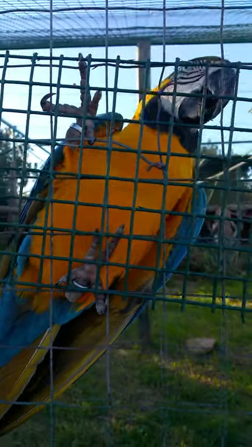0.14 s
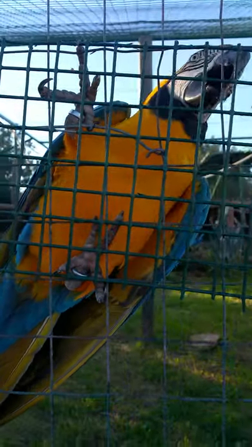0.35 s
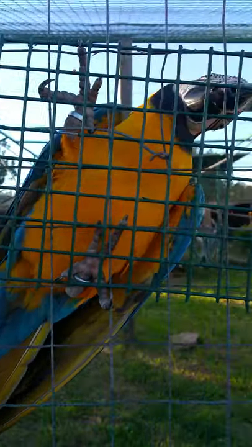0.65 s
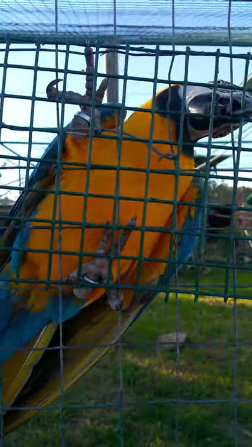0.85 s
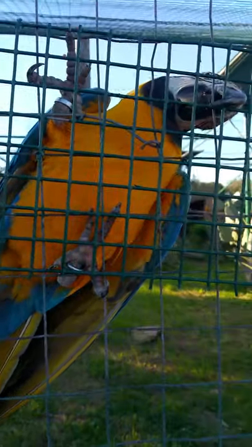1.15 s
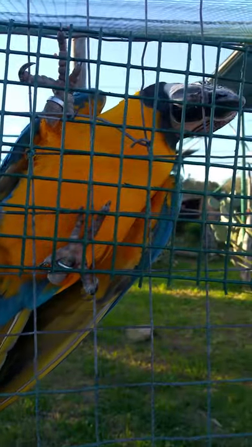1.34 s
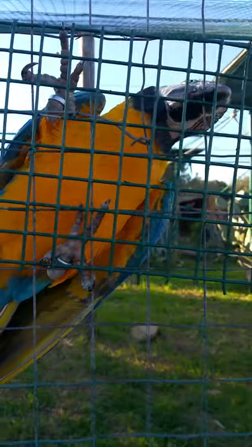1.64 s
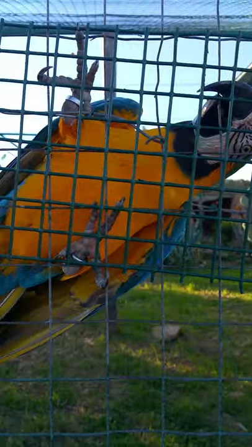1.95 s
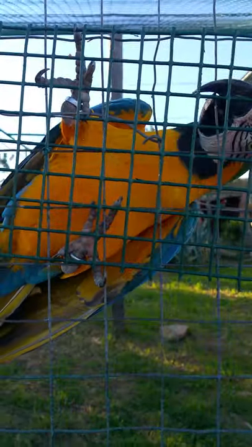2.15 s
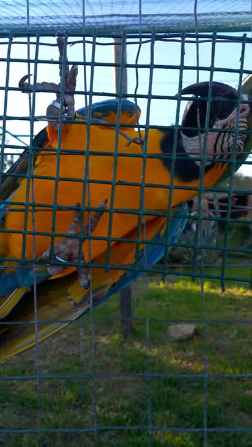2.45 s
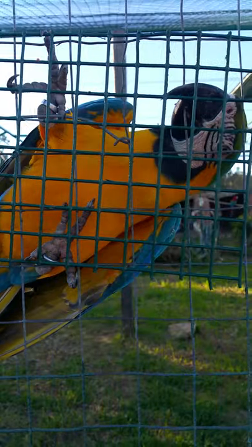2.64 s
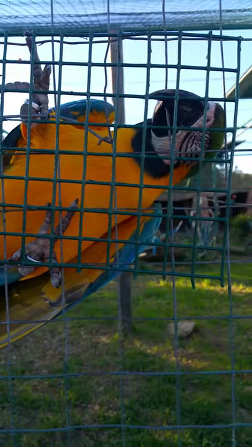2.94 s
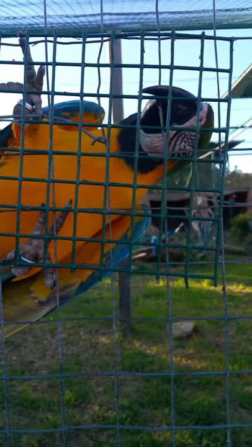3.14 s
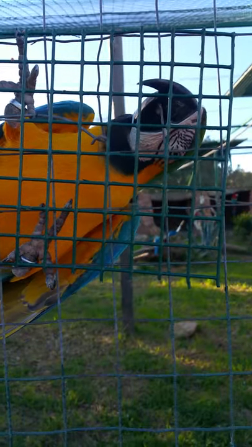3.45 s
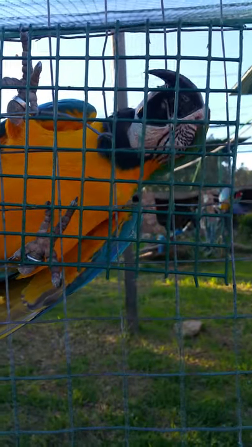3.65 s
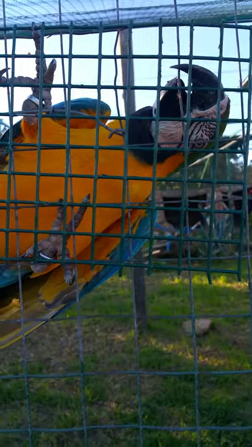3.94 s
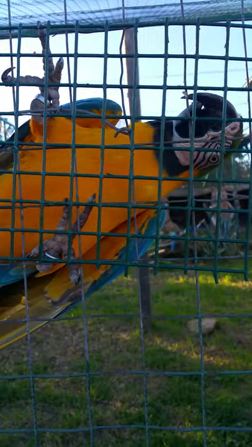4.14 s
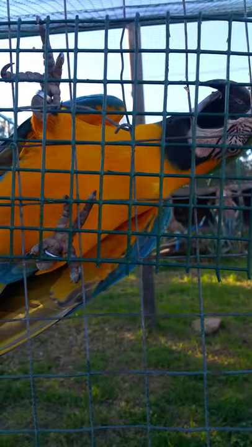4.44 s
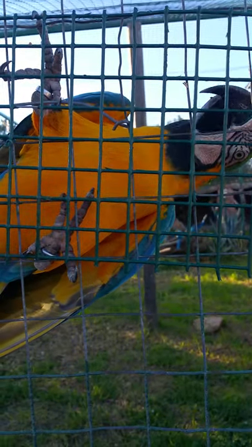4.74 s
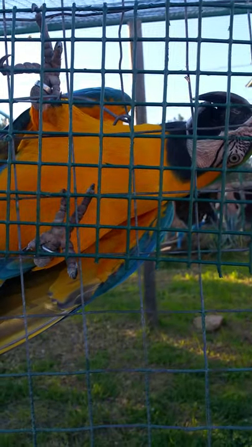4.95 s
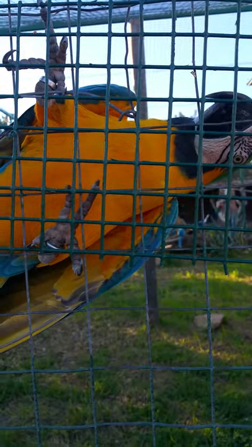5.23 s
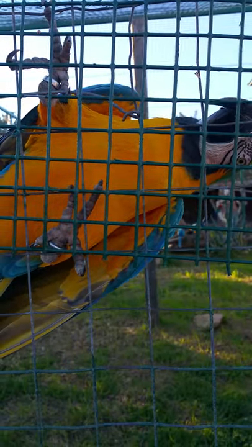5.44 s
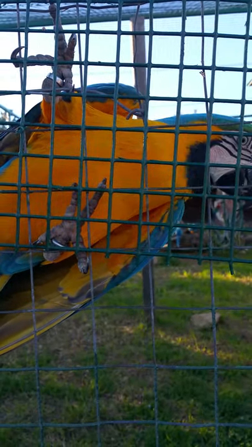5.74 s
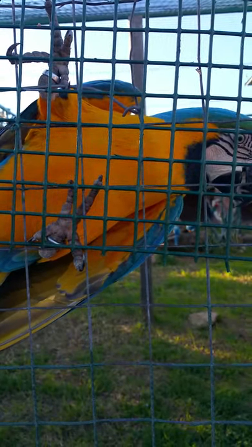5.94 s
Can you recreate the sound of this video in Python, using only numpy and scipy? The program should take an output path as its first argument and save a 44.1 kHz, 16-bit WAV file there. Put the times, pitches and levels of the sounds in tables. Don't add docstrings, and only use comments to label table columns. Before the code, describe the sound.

Loud raspy parrot squawk at the start, several seconds of faint bird chatter and soft wire ticks over airy hum, then a second hoarse squawk.

```python
import sys
import numpy as np
from scipy import signal
from scipy.fft import rfft, irfft
from scipy.io import wavfile
from scipy.ndimage import uniform_filter1d

SR = 44100
rng = np.random.default_rng(int(sys.argv[2]) if len(sys.argv) > 2 else 0)


def unload_wav(signal):
    wavfile.write(
        sys.argv[1],
        SR,
        np.round(np.clip(np.atleast_2d(signal).T, -1, 1) * 32767).astype(np.int16),
    )


def linear_from_db(decibels):
    return 10 ** (np.asarray(decibels, float) / 20)


N = 268480
TIME = np.arange(N) / SR

# [t/s, level/dB]
PHONE_GAIN = [(0, 0.5), (.15, 4), (.3, -12), (.55, -9), (1.65, -11), (1.9, -2), (2.5, -.5), (5, .5),
              (5.6, -1.5), (5.8, 3.5)]
# [f/Hz, width/Hz, level/dB]
WIDE_BEAK = [(2820, 550, 0), (4070, 930, 5.5), (5000, 540, 0.5), (5700, 590, -10.5), (8900, 1900, -20.5),
             (13000, 3000, -31)]
# [t/s, brightness/dB]
FIRST_BEAK_OPENING = [(.164, -3), (.19, -16), (.217, -5.5), (.29, 0), (.39, 4), (.46, 2), (.49, -10.5)]
THROB_SAG = 0.031


def level(x, db):
    return x * linear_from_db(db) / np.sqrt(np.mean(x ** 2))


def read(table, at):
    return np.interp(at, *np.transpose(table))


def colour(x, table):
    hz, db = np.transpose(table)
    bins = np.log(np.fft.rfftfreq(N, 1 / SR) + 1e-3)
    return irfft(rfft(x) * linear_from_db(np.interp(bins, np.log(hz), db, left=-80, right=-80)), N)


def walk(rate):
    k = int(SR / rate)
    steps = np.repeat(rng.standard_normal(N // k + 1), k)
    return 1.3 * uniform_filter1d(uniform_filter1d(steps, k), k)[:N]


def swells(table, calm_db):
    power = linear_from_db(2 * calm_db)
    for middle, width, db in table:
        power = power + linear_from_db(2 * db) * np.exp(-((TIME - middle) / width) ** 2)
    return np.sqrt(power) * linear_from_db(read(PHONE_GAIN, TIME))


def ports(x, lag_ms, pan_db):
    turn = np.exp(-2j * np.pi * np.fft.rfftfreq(N, 1 / SR) * lag_ms / 1000)
    later = irfft(rfft(x) * turn, N)
    return np.array([x * linear_from_db(pan_db / 2), later * linear_from_db(-pan_db / 2)])


def scatter(x, t60, db):
    t = np.arange(int(SR * .6)) / SR
    fade = np.exp(-np.log(1000) * t / t60) * (t > .004)
    tail = rng.standard_normal((2, len(t))) * fade
    tail = tail / np.sqrt(np.sum(tail ** 2) / 2)
    return linear_from_db(db) * signal.fftconvolve(x[None], tail, axes=1)[:, :N]


def air():
    # [f/Hz, level/dB per Hz]
    hum_colour = [(65, -27), (110, 0), (140, -4.5), (324, -5.5), (371, -9), (569, -8.5), (802, -9.5),
                  (1020, -8), (1650, -13.5), (2570, -17), (3100, -14), (5190, -15), (6590, -33),
                  (8570, -58), (14500, -120)]
    # [f/Hz, likeness 0-1]
    likeness = [(60, 0.98), (120, 1), (230, 0.92), (440, 0.93), (840, 0.81), (1640, 0.49), (3170, 0.03),
                (6140, 0.1)]
    # [f/Hz, level/dB per Hz]
    treble_colour = [(6000, -7), (7000, -3), (9000, -4.5), (12000, -4.5), (15500, -8.5), (16500, -12)]
    alike_hz, alike_share = np.transpose(likeness)
    hum, swell = 0, walk(1.8)
    for hz in 68 * 2 ** np.arange(0, 7.6, .5):
        band = [(hz / 1.42, -30), (hz / 1.1, 0), (hz * 1.1, 0), (hz * 1.42, -30)]
        mid, side = (colour(rng.standard_normal(N), band) for _ in range(2))
        alike = np.clip(np.interp(np.log(hz), np.log(alike_hz), alike_share), 0, 1)
        pair = np.sqrt(1 + alike) * mid + np.sqrt(1 - alike) * side * np.array([[1], [-1]])
        hum = hum + linear_from_db(0.43 * swell + 2.86 * walk(6)) * pair
    hum = level(np.array([colour(port, hum_colour) for port in hum]), -49.5 + 0.5)

    hiss_hz, hiss_width_hz = 12920, 460
    band = [(hiss_hz - hiss_width_hz, -25), (hiss_hz, 0), (hiss_hz + hiss_width_hz, -25)]
    hiss = level(np.array([colour(rng.standard_normal(N), band) for _ in range(2)]), -77.5)
    treble = level(np.array([colour(rng.standard_normal(N), treble_colour) for _ in range(2)]), -68.5)
    return (hum + hiss + treble * linear_from_db(1.3 * walk(14))) * linear_from_db(read(PHONE_GAIN, TIME))


def rumble():
    # [f/Hz, level/dB per Hz]
    bass_colour = [(28, -21), (42, 1.5), (56, 1), (75, -5.5), (100, 0), (125, -22.5)]
    # [middle t/s, half width/s, level/dB]
    gusts = [
        (2.2, .15, -55),
        (2.9, 0.31, -50),
        (5.2, 0.19, -54),
    ]
    mid, side = (level(colour(rng.standard_normal(N), bass_colour), -2.0) for _ in range(2))
    pair = np.array([1.07 * mid + 0.057 * side, 1.17 * mid - .12 * side])
    return swells(gusts, calm_db=-54) * linear_from_db(1.5 * walk(4.93)) * pair


def whistle(length, hz0, hz1, hz2, overtone_db, waver):
    u = np.arange(int(length * SR)) / (length * SR)
    hz = hz0 + (4 * hz1 - 3 * hz0 - hz2) * u + (2 * hz0 + 2 * hz2 - 4 * hz1) * u ** 2
    wobble = np.interp(u * length * 250, np.arange(128), rng.standard_normal(128))
    hz = hz * (1 + waver * min(.05 / length, 1) ** 2 * wobble)
    phase = 2 * np.pi * np.cumsum(hz) / SR
    ends = np.minimum(np.sin(np.pi * u) * max(length / 0.029, 1), 1) ** 0.7
    return ends * (np.sin(phase) + linear_from_db(overtone_db) * np.sin(2 * phase))


def flock():
    # [f/Hz, level/dB per Hz]
    chatter_colour = [(820, -59), (1400, -31), (1610, -26), (1780, -6), (2410, -6), (2860, -3.5),
                      (3560, -4), (4770, -9), (6590, -20.5), (8570, -68), (14500, -120)]
    # [middle t/s, half width/s, level/dB]
    bouts = [(.62, 0.053, -49.5), (.83, 0.032, -56), (1.14, 0.052, -49), (1.35, 0.053, -49.5),
             (1.82, 0.085, -52), (2.06, 0.081, -53), (2.31, 0.071, -46.5), (2.6, 0.078, -48),
             (2.84, 0.057, -45), (3.09, 0.056, -42.5), (3.57, 0.17, -47.5), (3.93, 0.2, -51),
             (4.17, 0.048, -49.5), (4.29, 0.046, -46), (4.55, 0.061, -48.5), (4.72, 0.037, -52.5),
             (4.99, 0.064, -45), (5.37, 0.051, -49.5), (5.5, .05, -51.5)]
    out = np.zeros(N + SR)
    for when, pitch, fall, length, size in rng.random((7000, 5)):
        hz = 1500 * 4.6 ** pitch
        middle_hz, last_hz = hz * (1 - 0.0798 * fall), hz * (1 - 0.36 * fall)
        note = whistle(0.0044 + 0.02 * length, hz, middle_hz, last_hz, overtone_db=-26, waver=0.0342)
        start = int(when * N)
        out[start:start + len(note)] += np.sqrt(hz) * linear_from_db(-1.5 * np.log(size)) * note
    out = level(colour(out[:N], chatter_colour), -0.97) * swells(bouts, calm_db=-57.5)
    return ports(out, lag_ms=.03, pan_db=-1.5) * linear_from_db(-2.0) + scatter(out, t60=0.17, db=-2)


def sing(table, waver, flutter_db):
    out = np.zeros(N)
    for s, length, *hz, db in table:
        note = linear_from_db(db) * whistle(length, *hz, overtone_db=-25, waver=waver)
        out[int(s * SR):int(s * SR) + len(note)] += note
    return out * linear_from_db(flutter_db * walk(80))


def glides(table, early):
    return [(s, length, a, a + (b - a) * (.5 + early), b, db) for s, length, a, b, db in table]


def puffs(hz, swell, jitter, shimmer_db, air_db):
    chance, taps = rng.standard_normal((128, 2)), np.arange(-8, 9)
    out = linear_from_db(air_db) * np.append(swell * rng.standard_normal(N // 16)[:len(hz)], np.zeros(17))
    place = 0.
    for wander, size in chance:
        i = int(place)
        if i >= len(hz):
            break
        puff = np.sinc(taps - place + i) * np.hanning(19)[1:-1]
        out[i + 8 + taps] += swell[i] * linear_from_db(shimmer_db * size) * puff
        place += SR / hz[i] * np.exp(jitter * wander)
    return out


def ring(pulses, modes):
    t = np.arange(SR // 20) / SR
    tones = 0
    for k, (f, width, db) in enumerate(modes):
        tones = tones + (-1) ** k * linear_from_db(db) * np.exp(-np.pi * width * t) * np.sin(2 * np.pi * f * t)
    return signal.fftconvolve(pulses, tones * (np.exp(-t / .00015) - 1))[:N]


def voice(runs, throat, beak, hiss_db, **roughness):
    low, high = np.zeros(N + SR), np.zeros(N + SR)
    for s, hz, swell, bright_db in runs:
        burst, start = puffs(hz, swell, **roughness), int(s * SR) - 8
        breath = swell * rng.standard_normal(N // 16)[:len(hz)]
        hiss = linear_from_db(hiss_db) * np.append(breath, np.zeros(17))
        low[start:start + len(burst)] += burst
        high[start:start + len(burst)] += (burst + hiss) * linear_from_db(bright_db)
    return ring(low, throat) - ring(high, beak)


def throb(s, length, hz0, hz1, db, bright_db, start):
    u = np.arange(int(length * SR)) / (length * SR)
    swell = linear_from_db(db) * np.minimum(start + 2.8 * u, 1) * np.minimum(0.46 + 1.3 * (1 - u), 1)
    return s, hz0 + (hz1 - hz0) * u, swell, bright_db


def far_parrot():
    # [t/s, length/s, peak level/dB]
    growl_table = [
        (5.14, .15, -48),
        (5.25, 0.068, -44),
        (5.33, 0.098, -43.5),
        (5.425, .07, -42.5),
        (5.489, .091, -43),
        (5.574, .068, -50.5),
    ]
    # [f/Hz, width/Hz, level/dB]
    far_throat = [(656, 200, -2.5), (873, 130, -2.5), (1433, 210, -3)]
    barks = [(1.784 + k * .036, .018, 300, 300, -48, -2.5) for k in range(3)]
    growl = [(s, length, 139.3, 139.3, db, -24) for s, length, db in growl_table]
    runs = [throb(*row, start=0.64) for row in barks + growl]
    return voice(runs, far_throat, WIDE_BEAK, jitter=0.0503, shimmer_db=6.0, air_db=-21, hiss_db=-22)


def single_birds():
    # [t/s, length/s, f/Hz, peak level/dB]
    whistles = [(0, 0.06, 3410, -51), (.51, 0.056, 1950, -53), (.67, .03, 6300, -74),
                (.703, .05, 6050, -71), (1.43, .2, 2644, -62.5), (1.6, 0.29, 2650, -61.5),
                (2.2, 0.077, 2780, -58), (2.488, 0.15, 908, -52), (3.25, 0.08, 181, -53.5),
                (3.29, 0.17, 852, -58), (3.865, 0.1, 4310, -41.5), (3.965, 0.059, 4365, -40.5)]
    # [t/s, length/s, first f/Hz, last f/Hz, peak level/dB]
    chirps = [(.64, 0.094, 3440, 3010, -58), (.81, .047, 3400, 2930, -64), (1.513, .032, 5450, 4640, -63.5),
              (2.505, 0.039, 4580, 3900, -48.5), (2.695, .023, 6230, 5250, -34),
              (2.781, .029, 6300, 4720, -38), (2.809, .049, 3670, 2350, -48.5),
              (3.645, 0.082, 2620, 2200, -57), (3.809, .041, 4450, 3750, -46),
              (4.035, 0.026, 2820, 2590, -45.5), (4.178, 0.036, 6190, 5070, -35.5),
              (4.263, .038, 6420, 3620, -38), (4.292, 0.081, 3400, 2150, -48.5),
              (4.533, 0.072, 2370, 2080, -51), (4.675, 0.029, 5700, 4300, -42),
              (4.699, 0.043, 4140, 3100, -41), (4.734, .041, 4020, 3000, -42.5),
              (4.838, 0.048, 5200, 4200, -55), (5.102, 0.031, 3900, 3556, -49),
              (5.21, 0.04, 3340, 3030, -54.5), (5.302, 0.095, 3750, 3050, -54),
              (5.415, 0.041, 6430, 4130, -40), (5.71, .039, 4660, 4300, -47)]
    # [t/s, length/s, first f/Hz, last f/Hz, peak level/dB]
    risers = [
        (1.868, .1, 490, 580, -51.5),
        (3.957, 0.035, 3300, 3620, -42.5),
        (3.993, 0.037, 2900, 3500, -41),
        (4.49, .028, 2430, 2560, -42),
        (4.738, 0.062, 2460, 2700, -52),
        (5.39, .028, 4070, 6480, -42.5),
        (5.498, 0.054, 3480, 5350, -44),
    ]
    # [t/s, length/s, first f/Hz, last f/Hz, peak level/dB]
    hoarse = [(1.14, 0.051, 3700, 3220, -61), (1.31, .08, 4300, 3360, -58), (1.75, .068, 5900, 5000, -56.5),
              (2.02, 0.06, 3450, 3160, -53.5), (2.17, 0.039, 4500, 3640, -51),
              (2.49, 0.032, 5800, 5100, -53), (2.55, 0.043, 4600, 4000, -51), (2.742, .13, 900, 633, -52.5),
              (3.36, 0.216, 2720, 2800, -57), (4.53, 0.042, 4700, 4300, -49),
              (4.668, 0.021, 3500, 5840, -47), (1.35, 0.57, 222, 224, -69.5),
              (4.62, 0.43, 172, 178.6, -58.5)]
    sag = 0.0086
    level_notes = [(s, length, hz * (1 + sag), hz, hz * (1 - sag), db) for s, length, hz, db in whistles]
    clear = glides(chirps, early=0) + glides(risers, early=0.23) + level_notes
    out = sing(clear, waver=.035, flutter_db=5)
    far = sing(glides(hoarse, early=0), waver=.09, flutter_db=6) + far_parrot()
    near = ports(out, lag_ms=0.047, pan_db=-2.5) + scatter(out, t60=0.16, db=-5)
    return near + ports(far, lag_ms=0.047, pan_db=-0.3) + scatter(far, t60=0.19, db=-4.5)


def held(curve, lift_db):
    s, *columns = np.transpose(curve)
    hz, db, bright_db = (np.interp(np.arange(s[0], s[-1], 1 / SR), s, c) for c in columns)
    return s[0], hz, linear_from_db(db + lift_db) / np.sqrt(hz / 250), np.append(bright_db, np.full(17, bright_db[-1]))


def throbs(table, beak, start):
    runs = []
    for s, length, hz, db in table:
        first_hz, last_hz = hz * (1 + THROB_SAG / 2), hz * (1 - THROB_SAG / 2)
        runs.append(throb(s, length, first_hz, last_hz, db, read(beak, s), start))
    return runs


def rattle():
    # [t/s, length/s, pulse rate f/Hz, peak level/dB, level of the weak trail after it/dB]
    rattle_throbs = [
        (.217, .011, 353, -10.5, -20.5),
        (0.25, 0.01, 417, -10.5, -27),
        (0.288, .014, 334, -7.5, -27),
        (0.3219, .010, 382, -8.5, -25),
        (0.3566, 0.011, 384.5, -9.5, -34),
        (.393, 0.007, 425, -8.5, -24),
        (.420, 0.013, 429.6, -11, -22.5),
        (0.457, .013, 375.3, -12, -18),
    ]
    # [t/s, pulse rate f/Hz, level/dB]
    flicks = [
        (.21, 900, -25),
        (.281, 408, -16.5),
        (.386, 483, -21),
        (.493, 320, -19.5),
    ]
    ring_until_s = .27
    table = [row[:-1] for row in rattle_throbs] + [(s, 0.0049, hz, db) for s, hz, db in flicks]
    runs = throbs(table, FIRST_BEAK_OPENING, start=0.62)
    for s, length, hz, _, db in rattle_throbs:
        if s < ring_until_s:
            hz, bright_db = 934, -34
        else:
            hz, bright_db = hz * .58, read(FIRST_BEAK_OPENING, s + length) + 2.5
        trail_s = 0.011 + 0.055 * max(s - ring_until_s, 0)
        runs.append(throb(s + length, trail_s, hz, hz * (1 - 2 * THROB_SAG), db, bright_db, start=0.79))
    return runs


def first_squawk():
    # [t/s, pulse rate f/Hz, level/dB, beak brightness/dB]
    croon = [
        (.066, 225.2, -65, -12),
        (.085, 221, -51, -21),
        (.100, 214.8, -34, -12),
        (.120, 210.3, -29, -10),
        (.135, 270.3, -29.5, -7.5),
        (.148, 307, -27, -3),
        (.160, 311, -24, -6),
    ]
    # [t/s, length/s, pulse rate f/Hz, peak level/dB]
    stutter = [
        (.164, 0.012, 309, -22.5),
        (.172, 0.013, 290, -22.5),
        (.186, 0.0076, 300, -24),
    ]
    # [f/Hz, width/Hz, level/dB]
    shut_throat = [(510, 304, 2.5), (933, 142, 3), (1320, 116, -0.5)]
    shut_beak = [(1820, 120, -6), (3000, 200, 1.5), (3900, 210, -2.5)]
    open_throat = [(417, 860, -35), (900, 183, -3), (1950, 440, 3)]
    open_beak = [(2700, 360, 3), (3710, 415, 0.5), (4300, 460, -3), (4960, 710, 2.5), (5380, 520, -4.5),
                 (6300, 450, -14.5), (8200, 660, -21.5), (10800, 1950, -18.5), (14500, 2200, -21)]
    runs = [held(croon, lift_db=9)] + throbs(stutter, FIRST_BEAK_OPENING, start=0.96)
    smooth = voice(runs, shut_throat, shut_beak, jitter=.012, shimmer_db=1, air_db=-36, hiss_db=-24)
    return smooth + voice(rattle(), open_throat, open_beak, jitter=.035, shimmer_db=1.5, air_db=-32, hiss_db=-30)


def second_squawk():
    # [t/s, pulse rate f/Hz, level/dB, beak brightness/dB]
    whine = [
        (5.772, 272.5, -35.5, -6),
        (5.797, 391, -29, -9),
        (5.813, 457, -23.5, -17),
        (5.822, 457, -26.5, -13),
        (5.829, 483, -20, -8),
        (5.837, 516, -39, -18),
    ]
    # [t/s, length/s, pulse rate f/Hz, peak level/dB]
    screech = [(5.664, 0.11, 258, -53), (5.704, .048, 242.3, -33.5), (5.738, 0.035, 268, -30),
               (5.842, .034, 417.5, -26), (5.866, .016, 977, -21), (5.885, 0.033, 347, -21.5),
               (5.915, 0.017, 333, -17.5), (5.934, .014, 349.5, -16), (5.946, 0.018, 998, -22),
               (5.961, .034, 733, -19), (5.997, .035, 739, -18.5), (6.026, 0.0075, 310, -10),
               (6.036, 0.015, 754, -21), (6.05, .0082, 220, -12), (6.059, .016, 277, -10),
               (6.083, .01, 287, -22.5)]
    # [t/s, brightness/dB]
    beak_opening = [(5.66, -22), (5.74, -10), (5.84, -5), (5.95, -3), (6.0, -9), (6.08, -8.5)]
    # [f/Hz, width/Hz, level/dB]
    round_throat = [(440, 600, 3), (976, 180, -3), (1480, 330, -7.5)]
    wide_throat = [(417, 410, -10.5), (900, 197, -2), (1580, 400, 0)]
    smooth = voice([held(whine, lift_db=8.5)], round_throat, WIDE_BEAK,
                   jitter=.012, shimmer_db=1, air_db=-36, hiss_db=-24)
    return smooth + voice(throbs(screech, beak_opening, start=0.45), wide_throat, WIDE_BEAK,
                          jitter=.03, shimmer_db=2.5, air_db=-24, hiss_db=-13)


def parrot():
    steep = signal.butter(2, 260, "high", fs=SR, output="sos")
    first = signal.sosfilt(steep, first_squawk())
    second = signal.sosfilt(steep, second_squawk())
    near = ports(first, lag_ms=0.19, pan_db=2.0) + ports(second, lag_ms=0.11, pan_db=0.2)
    both = first + second
    return near + scatter(both, t60=.05, db=-14) + scatter(both, t60=.45, db=-27)


def wire():
    # [t/s, peak level/dB, ringing f/Hz]
    ticks = [
        (1.879, -38.5, 527),
        (2.25, -49, 511),
        (2.398, -38, 496),
        (3.265, -37, 2400),
        (4.448, -34.5, 566),
        (5.282, -34, 636),
    ]
    out, t = np.zeros(N), np.arange(SR // 25) / SR
    for s, db, hz in ticks:
        scrape = uniform_filter1d(uniform_filter1d(rng.standard_normal(len(t)), size=7), size=7)
        shape = np.exp(-t / 0.015) * np.minimum(t / 0.0023, 1)
        knock = shape * (0.32 * np.sin(2 * np.pi * hz * t) + scrape)
        out[int(s * SR):int(s * SR) + len(t)] += linear_from_db(db + 2.5) * knock
    return ports(out, lag_ms=0.054, pan_db=0.0)


def scene():
    # [f/Hz, level/dB]
    right_shade = [(10, -1.5), (5500, -1), (7500, -1), (12000, -2), (20000, 0)]
    left, right = air() + rumble() + flock() + single_birds() + parrot() + wire()
    return np.array([left, colour(right, right_shade)])


def low_pass(x):
    return signal.sosfilt(signal.butter(12, 15830, fs=SR, output="sos"), x)


def record(dry):
    rounded = dry / (1 + (dry / .93) ** 4) ** .25
    return low_pass(rounded)


dry = scene()
out = record(dry)
unload_wav(out)
```